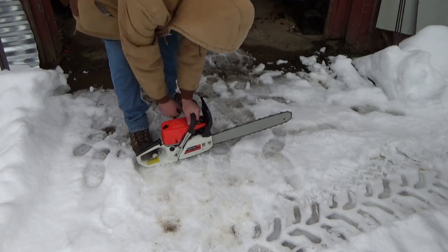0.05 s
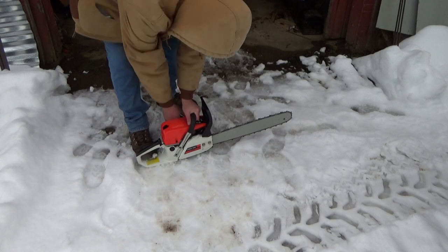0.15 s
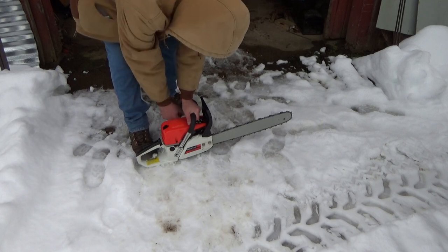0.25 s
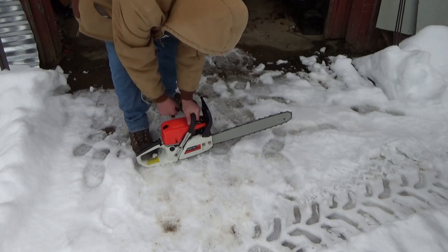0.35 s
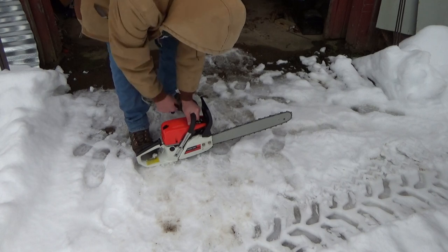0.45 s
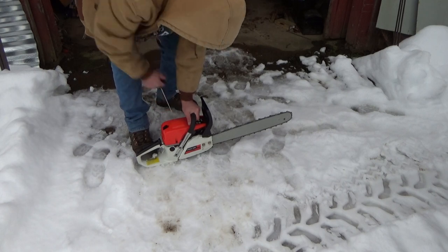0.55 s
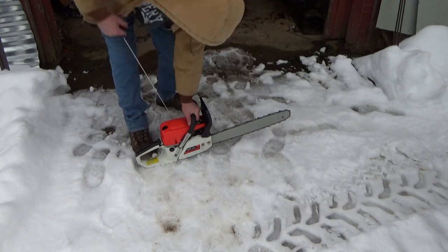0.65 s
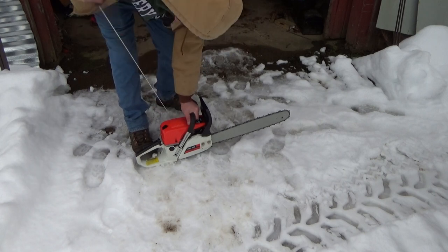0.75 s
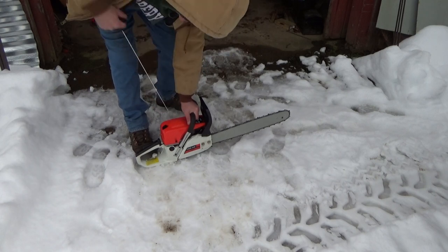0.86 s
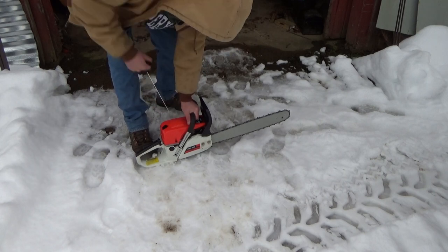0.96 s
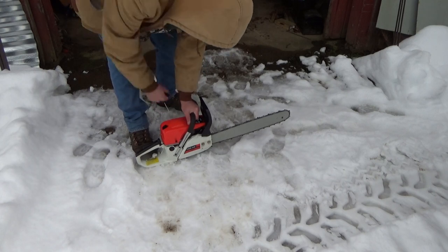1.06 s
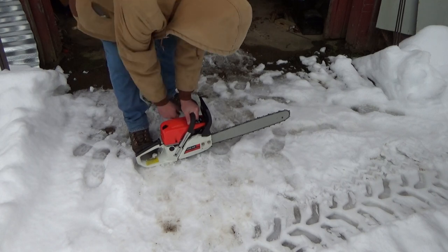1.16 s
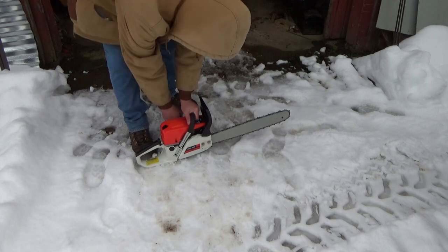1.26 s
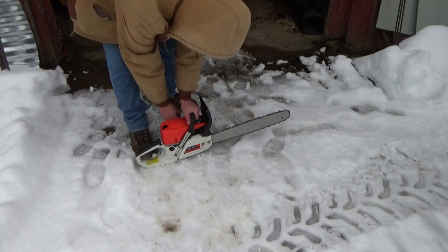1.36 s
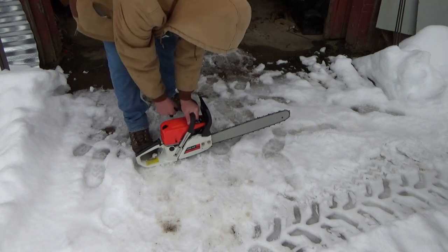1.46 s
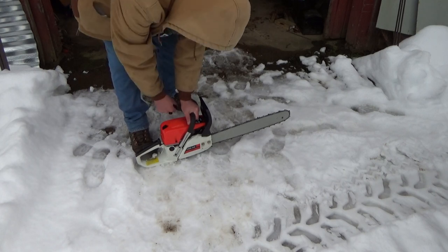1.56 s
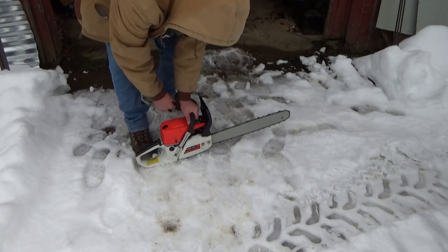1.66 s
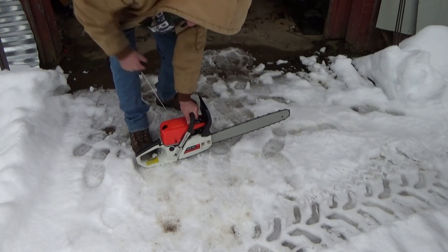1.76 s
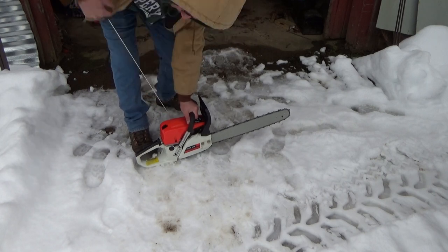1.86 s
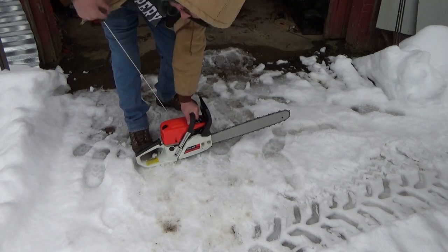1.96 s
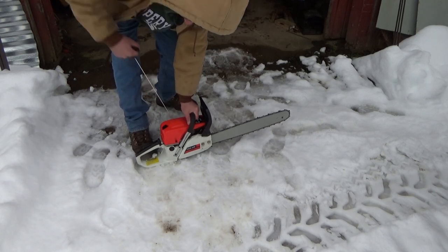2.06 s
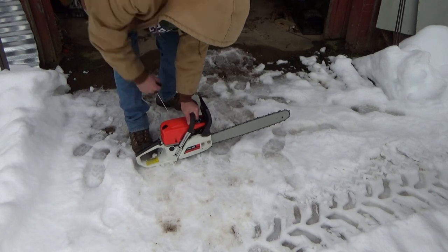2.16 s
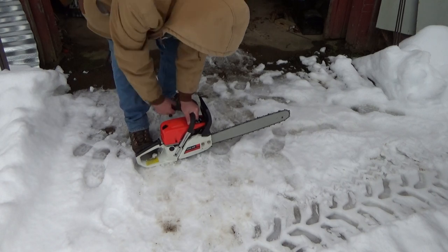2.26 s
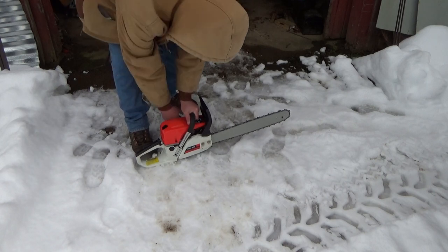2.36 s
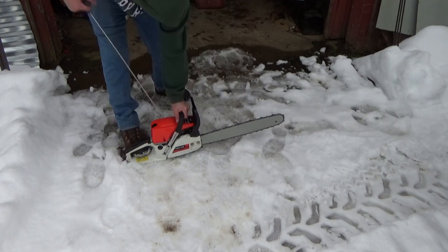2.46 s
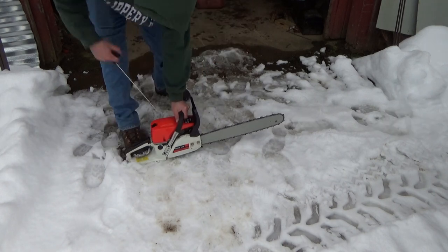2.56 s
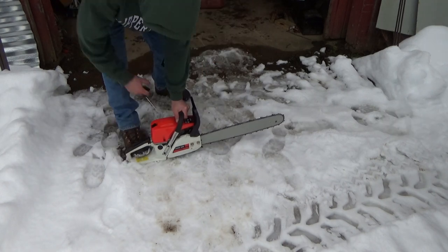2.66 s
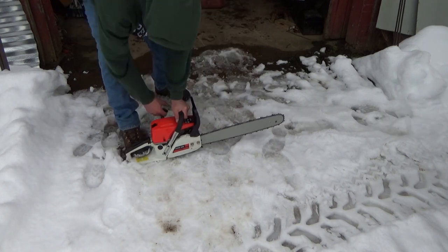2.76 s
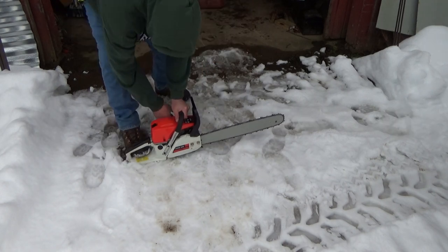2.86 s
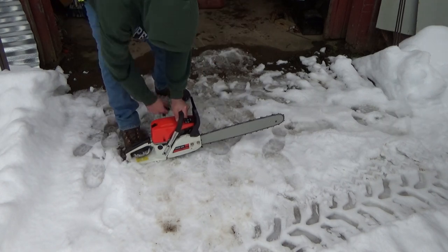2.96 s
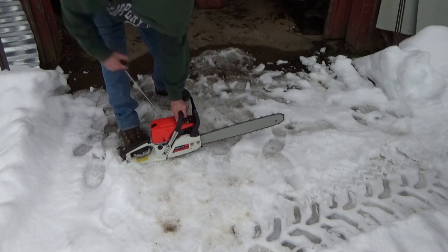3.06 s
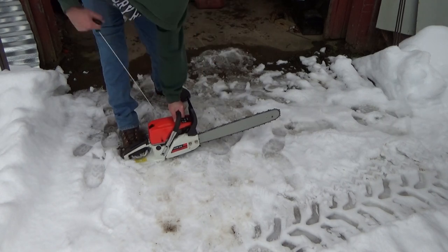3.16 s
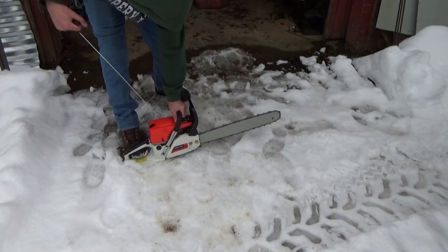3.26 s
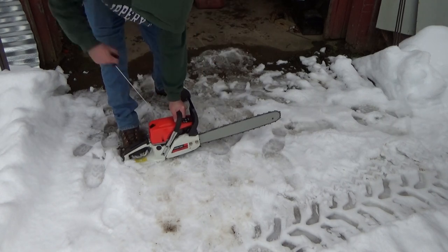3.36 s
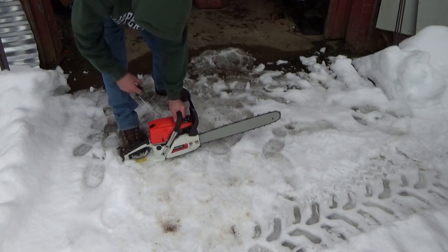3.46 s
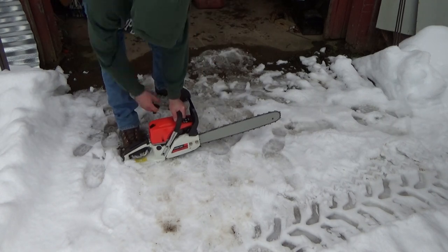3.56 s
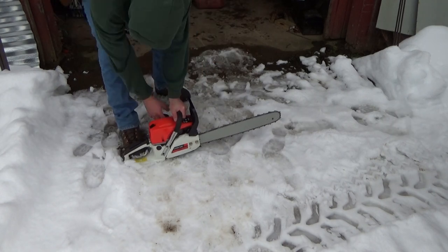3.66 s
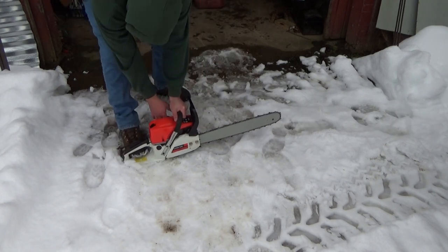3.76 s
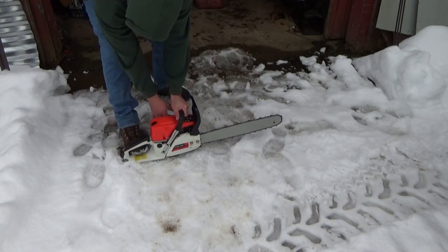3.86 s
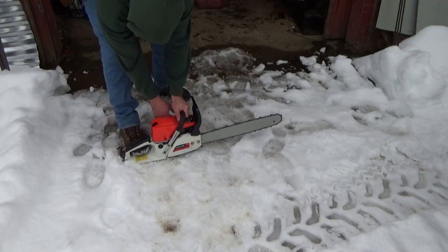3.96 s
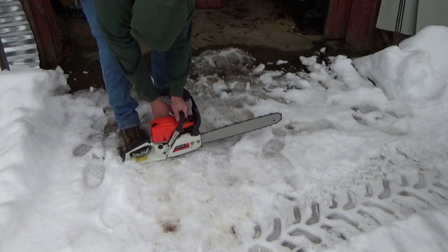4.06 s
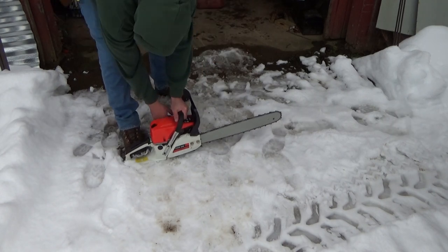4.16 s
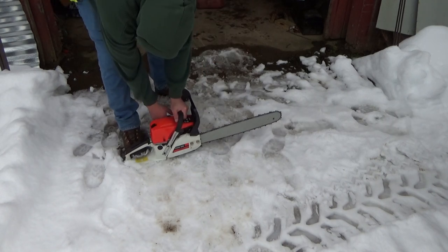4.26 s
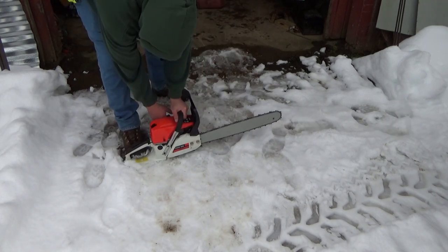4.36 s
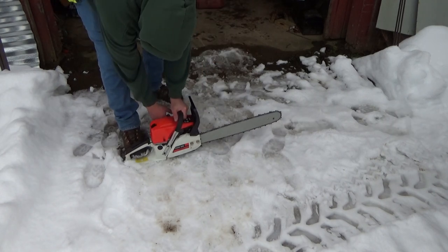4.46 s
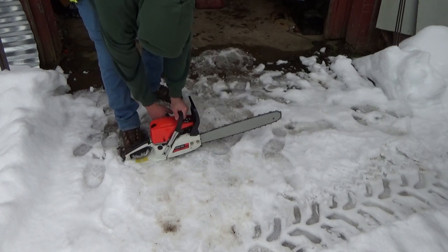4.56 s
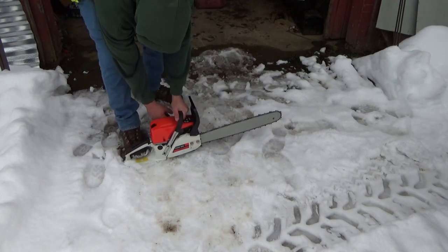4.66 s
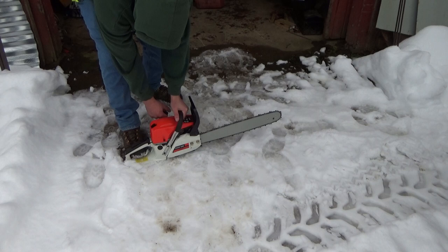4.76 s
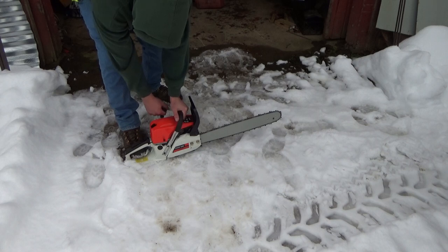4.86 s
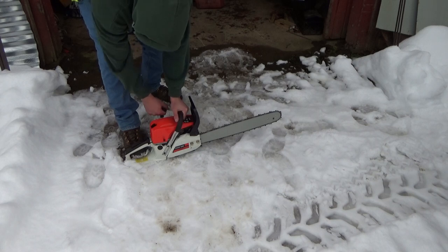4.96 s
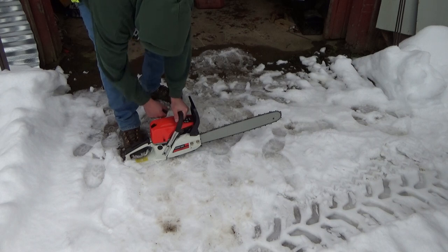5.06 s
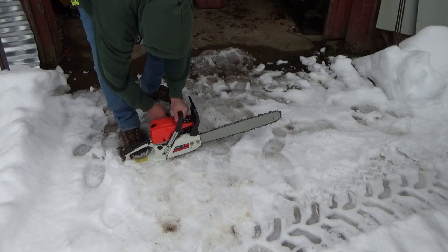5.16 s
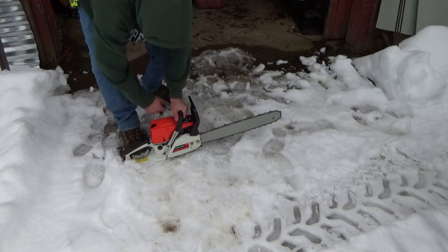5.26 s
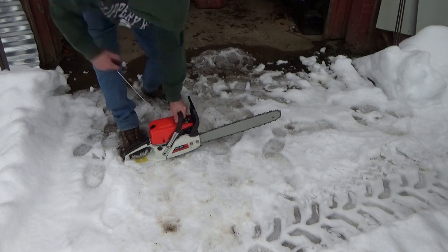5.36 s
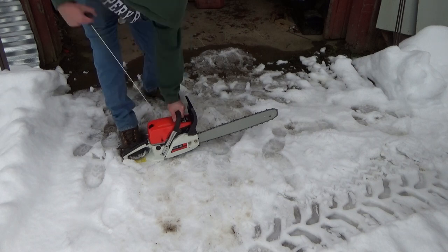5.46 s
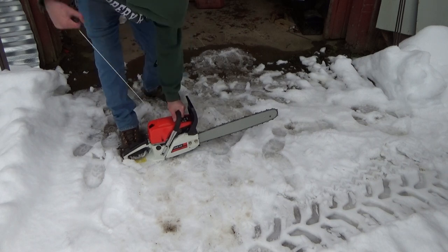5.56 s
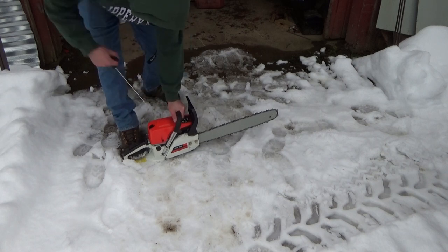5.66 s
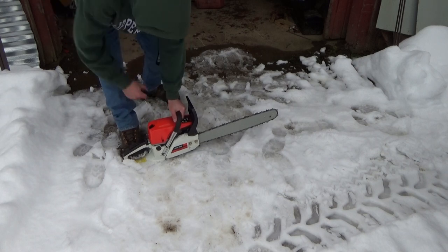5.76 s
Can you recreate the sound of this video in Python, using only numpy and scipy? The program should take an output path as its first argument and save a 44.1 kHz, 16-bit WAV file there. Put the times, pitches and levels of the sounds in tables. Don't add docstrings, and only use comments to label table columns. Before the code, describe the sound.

A cold chainsaw's starter cord is yanked five times, rasping and puffing, then ratcheting back slowly, with the engine never catching.

```python
import sys
import numpy as np
from scipy import signal
from scipy.fft import rfft, irfft, next_fast_len
from scipy.io import wavfile
from scipy.ndimage import uniform_filter1d

SR = 44100
rng = np.random.default_rng(int(sys.argv[2]) if len(sys.argv) > 2 else 0)


def wav_record(signal):
    frames = np.transpose(np.atleast_2d(signal))
    bounded = np.clip(frames, -1, 1)
    quanta = np.round(bounded * 32767).astype(np.int16)
    wavfile.write(sys.argv[1], SR, quanta)


def convert_level_to_amplitude(level_db):
    exponent = np.asarray(level_db, float) / 20
    return 10 ** exponent


N = 255559

# first stroke in seconds, spin-up gap in ms, fast gap in ms,
# number of fast strokes.
CRANK_SPINS = [
    (.772, 28.5, 21.7, 3),
    (1.91, 32, 21.4, 3),
    (3.2388, 28.2, 23.2, 2),
    (5.5175, 31.6, 25, 2),
]
COAST_GAPS_MS = [30, 45.5, 21, 49]
# pitch in Hz, width in Hz, level in dB.
PANELS = [(760, 26, -2), (1157, 1100, -40), (1292, 46, -2.5), (1572, 380, -4), (1830, 310, 7.5),
          (2144, 110, 6), (3030, 270, -8), (4860, 400, -68)]
# time in seconds, rms in dB,
# main pitch in Hz, tick relative to it in dB.
HANDLE_CLACKS = [(.6874, -14, 778, -8), (.7357, -19, 1220, -4), (.748, -17, 980, 2),
                 (.7881, -14.5, 754, -4), (1.1493, -29, 2100, 4), (2.214, -44, 2100, 0),
                 (3.4985, -40.5, 2100, 17.5), (1.3434, -21.5, 665, -3.5), (1.3563, -20, 685, -21),
                 (1.367, -36, 1120, 4.5), (1.8447, -18, 1155, -3.5), (1.8956, -13.5, 1193, -9),
                 (2.461, -26, 2720, 8), (2.4748, -23, 1344, -23), (2.9584, -25, 2172, 4.5),
                 (2.968, -20, 780, -10), (3.0747, -21.5, 633, -6.5), (3.131, -47, 903, 1),
                 (3.2144, -16, 760, 0.5), (3.823, -26.5, 2790, -2), (3.8308, -26.5, 730, -17),
                 (3.8527, -24, 580, -13), (5.2927, -28.5, 664, -16), (5.3167, -28, 735, -4.5),
                 (5.349, -22.5, 323, -7.5), (3.856, -26.5, 1277, -15), (5.3841, -22, 553, -13),
                 (5.431, -42, 710, 12), (5.4675, -22, 700, -9), (5.7306, -32, 606, 7)]
# time in seconds, rms in dB, main pitch in Hz, tick relative in dB.
GLOVE_TAPS = [(.397, -55, 900, 11.5), (.4576, -31.5, 572, -2), (.511, -42, 900, 4.5),
              (.548, -33.5, 710, -10), (1.5203, -32.5, 640, -10), (1.553, -32, 1680, -18),
              (1.5736, -46, 1600, 10.5), (1.617, -32.5, 416, -18), (1.641, -40, 784, -12),
              (2.51, -48, 900, 4), (4.51, -28, 150, -22), (4.525, -33, 200, -25), (4.6908, -49, 1500, 6),
              (4.957, -49, 2500, 1), (4.991, -63, 2500, 12), (5.022, -36, 1060, -20),
              (5.023, -45, 600, -22), (5.023, -24.5, 330, -16)]


def engine():
    # can resonance in Hz, level in dB, t60 in seconds.
    cans = [(230, 0, .06), (305, -5, .035), (378, -3, .05), (422, -2, .06), (480, -4.5, .04),
            (545, -7, .03), (620, -14, .035), (755, -15, .05), (910, -19, .04)]
    out = np.zeros(N)
    t = np.arange(-400, 6000) / SR
    puffs = crank()
    phases = rng.normal(0, .4, (len(puffs), len(cans)))
    late = np.maximum(t + 0.0007, 0) / 0.0011
    heave = late * (1 - late / 2) * np.exp(1 - late)
    for (s, db, hz, ring_db), row in zip(puffs, phases):
        width = np.where(t < 0, .4, .7) / hz
        swing = np.cos(2 * np.pi * hz * t * (1 - 0.24 * np.tanh(hz * t)))
        puff = swing * np.exp(-.5 * (t / width) ** 2)
        weakness_db = max(-20 - db, 0)
        ring = 0
        for (f, can_db, t60), phase in zip(cans, row):
            below_puff = 10.4 * np.maximum(np.log2(hz / f), 0)
            dulling = 4 * weakness_db * np.log2(f / 230)
            decay = 60 * abs(t) / t60
            ring = ring + convert_level_to_amplitude(can_db - below_puff - dulling - decay) * np.cos(2 * np.pi * f * t + phase)
        ringing = convert_level_to_amplitude(ring_db - 6.0) * np.clip(t / 0.0043, 0, 1) * ring
        add(out, s + t[0], convert_level_to_amplitude(db) * (puff + convert_level_to_amplitude(-8.0) * heave + ringing))
    return out


def crank():
    # time in seconds, peak in dB, pitch in Hz, muffler ring in dB.
    nudges = [
        (2.5497, -10, 324, 15),
        (2.566, -1, 233, 4),
        (2.603, -6, 180, 4.3),
        (2.635, -12, 195, 5),
        (2.6855, -23.5, 205, 9),
        (3.1235, -20, 174, 6.5),
        (3.1521, -20.5, 420, 21),
        (5.431, -19.5, 350, -0.5),
    ]
    # strength of the spin in dB, loss while coasting in dB per stroke.
    spin_levels = [(.1, 0.5), (.1, -0.65), (.1, -0.9), (.1, -0.8)]
    # peak in dB, pitch in Hz, muffler ring in dB.
    coasting = [(-6, 243, 4), (-11, 164, 5), (-20.5, 260, 6.5)]
    first, second, fast = (-3.5, 160, 2.6), (-2.5, 283, 4.4), (-6, 265, 4)
    last = (-24, 200, 12)
    rows = list(nudges)
    for (s, first_ms, fast_ms, count), (db, loss_db) in zip(CRANK_SPINS, spin_levels):
        times = s + np.cumsum([0, first_ms] + [fast_ms] * count + COAST_GAPS_MS) / 1000
        coast = [(d - k * loss_db, hz, ring) for k, (d, hz, ring) in enumerate(coasting + [last])]
        kinds = [first, second] + [fast] * count + coast
        rows += [(at, db + d, hz, ring) for at, (d, hz, ring) in zip(times, kinds)]
    return rows


def casing():
    # frequency in Hz, spectrum level in dB per Hz.
    bright_colour = [(1470, -11), (2500, -10.5), (3450, -6.5), (4070, -2.5), (4400, -1.5), (6070, -3.5),
                     (7740, -12), (9490, 1), (13400, -8.5), (15400, -23), (16300, -43)]
    # frequency in Hz, spectrum level in dB per Hz.
    body_colour = [(200, -7.5), (420, 1.5), (800, 0), (1300, -1), (2200, -2), (3200, 0), (5000, -18),
                   (8000, -30)]
    bright, body = rng.standard_normal((2, N))
    rings = 0
    for hz, width, db in PANELS:
        rings = rings + convert_level_to_amplitude(db) * evened(signal.lfilter(*signal.iirpeak(hz, hz / width, SR), body))
    bright = evened(coloured(bright, bright_colour))
    fizz = coloured(bright, [(7200, 0), (7800, -60)])
    sizzle = bright - fizz
    return fizz, sizzle, evened(coloured(body + convert_level_to_amplitude(-27.0) * rings, body_colour))


def strokes():
    # peak in seconds, rms in dB, rise in seconds, fall in seconds.
    swishes = [
        (3.91, -44.5, .02, 0.017),
        (4.08, -36, 0.013, 0.0085),
        (4.279, -37.5, 0.032, 0.0095),
        (4.57, -33, 0.036, 0.032),
        (4.28, -55.5, .2, 0.034),
        (4.575, -50, 0.084, 0.06),
    ]
    # start in seconds, level in dB.
    settles = [
        (0.224, -42),
        (1.36, -35),
        (2.471, -39.5),
        (2.955, -23),
        (3.849, -32),
    ]
    t = np.arange(N) / SR
    grip, scrape = (evened(uniform_filter1d(rng.standard_normal(N), size=n)) for n in (260, 110))
    drawn, winding = rubbing(t)
    parts = [drawn, winding, convert_level_to_amplitude(-69) ** 2]
    total = sum(parts)
    # casing body relative in dB, sizzle tilt in dB
    colours = [(-0.75, -0.62), (-2, 2.7), (1.3, -8)]
    tilt_db = sum(p * tilt for p, (_, tilt) in zip(parts, colours)) / total
    slack = (winding + 1e-9) / (total + 1e-9)
    settle = sum(convert_level_to_amplitude(db - 298 * abs(t - s)) ** 2 * (t > s) for s, db in settles)
    bright = total * convert_level_to_amplitude(1.3 * grip) ** 2
    body = sum(p * convert_level_to_amplitude(db) ** 2 for p, (db, _) in zip(parts, colours))
    body = (body + settle) * convert_level_to_amplitude(2.8 * grip) ** 2
    bursts = np.zeros(N)
    for at, db, ms in ticks():
        rise = np.clip(ms, 1, 20) * .00024
        u = t[:SR // 10] / rise
        add(bursts, at - rise, convert_level_to_amplitude(db - 1.78) ** 2 * (u * np.exp(1 - u)) ** 0.6)
    glove = 0
    for at, db, rise, fall in swishes:
        glove = glove + convert_level_to_amplitude(db) ** 2 * np.exp(-((t - at) / np.where(t < at, rise, fall)) ** 2)
    fizz = np.sqrt(bright + bursts + glove)
    sizzle = fizz * convert_level_to_amplitude(tilt_db + 2.0 * scrape * np.sqrt(1 - glove / fizz ** 2))
    body = np.sqrt(body + convert_level_to_amplitude(-8.0 - 1.3 * slack) ** 2 * bursts + convert_level_to_amplitude(-4.5) ** 2 * glove)
    return fizz, sizzle, body


def rubbing(t):
    # cord starts in seconds, cord at full speed in seconds, cord let go in seconds, rubbing in dB.
    pulls = [
        (0.632, 0.704, 0.87, -28),
        (1.784, 1.868, 1.994, -26),
        (2.527, 2.531, 2.55, -25.5),
        (3.053, 3.17, 3.3, -25.5),
        (5.323, 5.478, 5.63, -29),
    ]
    rest_db, let_go_db_per_s, winding_db_per_oct = -48.5, 74, 11.5
    drawn = 0
    for start, full, let_go, db in pulls:
        times = [start - .02, start, full, let_go, let_go + 1]
        level = np.interp(t, times, [-99, rest_db, db, db, db - let_go_db_per_s])
        drawn = drawn + convert_level_to_amplitude(level) ** 2 * (t < let_go + .4)
    winding = 0
    for s, lost, _, db in ratchet():
        times = [s[0] - .2, *s, s[-1] + 0.02]
        level = np.interp(t, times, [-75, *(db - winding_db_per_oct * lost), -75])
        winding = winding + convert_level_to_amplitude(level) ** 2
    return drawn, winding


def ratchet():
    # last tooth in seconds, last gap in ms, fast gap in ms, number of teeth.
    rewinds = [
        (.2145, 51, 17, 8),
        (1.3067, 47, 22, 9),
        (2.4273, 40, 21, 11),
        (2.9516, 54.6, 16, 11),
        (3.7626, 53.6, 21.5, 8),
    ]
    # tooth level in dB, rubbing level in dB.
    rewind_levels = [(-23, -31.5), (-22, -30.5), (-23.5, -35), (-24, -34), (-25.5, -38)]
    for (last, last_ms, fast_ms, count), (tooth_db, rub_db) in zip(rewinds, rewind_levels):
        gap = fast_ms + (last_ms - fast_ms) * .56 ** np.arange(count)
        s = last - (np.cumsum(gap) - gap) / 1000
        yield s[::-1], np.log2(gap / fast_ms)[::-1], tooth_db, rub_db


def ticks():
    # peak in seconds, rms in dB, length in ms.
    snaps = [(.0073, -16, 7.4), (.652, -29, 5.4), (.7646, -25, 19), (.9105, -27, 6), (.9204, -20, 6.6),
             (1.0183, -24, 9.9), (1.0418, -17.5, 8.6), (1.8138, -31, 8.5), (1.9518, -17.5, 7.1),
             (2.0261, -23.5, 5), (2.137, -23, 2.8), (2.232, -21.5, 20), (2.262, -18.5, 18),
             (2.3466, -16, 3.2), (2.356, -19.5, 10), (2.5513, -19.5, 16), (2.5726, -25, 13),
             (2.593, -22.5, 6.7), (2.607, -16.5, 3.9), (2.6576, -26, 9.9), (3.1546, -21, 7.2),
             (3.239, -27, 6), (3.2933, -18, 4.5), (3.3367, -35, 2), (3.3555, -17, 3.5), (3.5244, -20.5, 24),
             (5.4966, -20, 5.4), (5.5115, -19.5, 11), (5.5574, -19.5, 23), (5.7549, -26.5, 20)]
    rows = list(snaps)
    for s, lost, db, _ in ratchet():
        for at, octaves in zip(s, lost):
            a, b = rng.standard_normal(2)
            rows += [(at, db - 2 * octaves + .9 * a, 6.5 * convert_level_to_amplitude(1.5 * b))]
    for s, first_ms, fast_ms, count in CRANK_SPINS:
        rows += [(s + 0.0075, -28, 8)]
        overrun = s + (first_ms + count * fast_ms + sum(COAST_GAPS_MS[:2])) / 1000 - 0.0114
        rows += [(overrun + 0.007 * k, -21.5 + rng.standard_normal(), 3.75) for k in range(6)]
    for knock_rows, ms in ((HANDLE_CLACKS, 6), (GLOVE_TAPS, 5.3)):
        rows += [(s - .002, db + tick_db, ms) for s, db, _, tick_db in knock_rows]
    return rows


def mottled(x, depth_db):
    z = signal.stft(x, nperseg=256, noverlap=192)[2]
    patches = uniform_filter1d(rng.standard_normal(z.shape), size=6, axis=0)
    patches = evened(uniform_filter1d(patches, size=7, axis=1))
    return signal.istft(z * convert_level_to_amplitude(depth_db * patches), nperseg=256, noverlap=192)[1][:N]


def knocks():
    # frequency in Hz, spectrum level in dB per Hz.
    crack_colour = [(200, -14), (500, 3.5), (1200, 1), (3000, -1.5), (6000, -15), (8000, -15), (16000, -39)]
    out = np.zeros(N)
    t = np.arange(5000) / SR
    hits = blows()
    phases = rng.uniform(0, 2 * np.pi, (len(hits), len(PANELS)))
    cracks = evened(coloured(rng.standard_normal((len(hits), len(t))), crack_colour))
    for (s, db, hz, t60), row, crack in zip(hits, phases, cracks):
        others = 0
        for (f, *_), phase in zip(PANELS, row):
            others = others + convert_level_to_amplitude(-7 - 4 * abs(np.log2(f / hz))) * np.sin(2 * np.pi * f * t + phase)
        shape = convert_level_to_amplitude(db + 3.0 - 60 * t / np.clip(t60, .01, .2)) * np.clip(t / 0.0017, 0, 1)
        hard = convert_level_to_amplitude(-1.0) * np.clip(hz / 1100, 0, 1)
        add(out, s - .0025, shape * (np.sin(2 * np.pi * hz * t) + others + hard * crack))
    return out


def blows():
    clack_t60_s, tap_t60_s, panel_t60_s = 0.039, 0.023, 0.09
    rows = [(*row[:3], clack_t60_s) for row in HANDLE_CLACKS]
    rows += [(*row[:3], tap_t60_s) for row in GLOVE_TAPS]
    for s, _, db, _ in ratchet():
        rows += [(at + .004, db - 14, 2100, panel_t60_s) for at in s[-2::-2]]
    return rows


def yard():
    # frequency in Hz, spectrum level in dB per Hz.
    yard_colour = [(12, -40), (20, -6), (71, 0), (147, -3.5), (194, -13.5), (350, -7.5), (745, -12.5),
                   (1310, -17), (3490, -23.5), (6830, -31.5), (9840, -29.5), (15000, -38), (16300, -42)]
    t = np.arange(N) / SR
    air = rng.standard_normal((2, N))
    hum_swell = convert_level_to_amplitude(10 * np.exp(-((t - 4.2) / 0.2) ** 4))
    hum = signal.lfilter(*signal.iirpeak(425, 6, SR), air) * hum_swell
    mid, side = coloured(air + convert_level_to_amplitude(-4.0) * hum, yard_colour[:-1])
    swell = evened(uniform_filter1d(rng.standard_normal(N), size=5000))
    return convert_level_to_amplitude(-50 + 1.3 * swell) * np.array([mid, convert_level_to_amplitude(-3.1) * side]) / np.std(mid)


def echoes(x, taps, tail_db, t60):
    t = np.arange(SR // 4) / SR
    tail = rng.standard_normal(len(t)) * convert_level_to_amplitude(-60 * t / t60) * (t > .012)
    path = convert_level_to_amplitude(tail_db) * tail / np.linalg.norm(tail)
    for delay, db in taps:
        path[round(delay * SR)] += convert_level_to_amplitude(db)
    return signal.oaconvolve(x, path)[:N]


def evened(x):
    return x / np.sqrt(np.mean(x ** 2) + 1e-20)


def coloured(x, points):
    f, level = np.transpose(points)
    size = next_fast_len(x.shape[-1])
    hz = np.fft.rfftfreq(size, 1 / SR)
    gain = convert_level_to_amplitude(np.interp(np.log(hz + 1), np.log(f + 1), level))
    return irfft(rfft(x, size) * gain, size)[..., :x.shape[-1]]


def add(mix, s, sound):
    part = mix[max(round(s * SR), 0):][:len(sound)]
    part += sound[:len(part)]


def scene():
    # frequency in Hz, level in dB.
    wall_colour = [(90, -0.5), (170, -12.5), (260, 0), (450, 0)]
    # delay in seconds, level in dB.
    front_taps = [(.0062, -9), (.0095, -7.5), (.0144, -12)]
    # delay in seconds, level in dB.
    side_taps = [(.0047, -8.5), (.0101, -11), (.016, -19)]
    # frequency in Hz, gain of the side signal in dB.
    side_colour = [(60, -32), (130, -1.5), (290, 1.5), (640, 0.5), (1410, 2), (3100, -1.5), (6820, -0.5),
                   (15000, -15.5)]
    rasp = sum(noise * envelope for noise, envelope in zip(casing(), strokes()))
    rasp = mottled(rasp, 2.2) + knocks()
    puffs = engine()
    mid, side = yard()
    mid = mid + convert_level_to_amplitude(-2.0) * rasp + convert_level_to_amplitude(-13) * echoes(rasp, [(.0098, -7)], -1.8, 0.18)
    mid = mid + puffs + echoes(coloured(puffs, wall_colour), front_taps, -11, .17)
    lead = np.gradient(puffs) * SR / (2 * np.pi * 200)
    side = side + convert_level_to_amplitude(-12) * echoes(rasp, [(.0058, 1), (.0101, -15)], .1, 0.34) + convert_level_to_amplitude(-18.0) * lead
    side = side + echoes(puffs, side_taps, -14, .2)
    side = coloured(side, side_colour)
    return np.array([mid + side, mid - side])


def low_pass(x):
    return signal.sosfilt(signal.butter(12, 16450, fs=SR, output="sos"), x)


def record(dry):
    # fade out start and end, fade in start and end, all in seconds.
    change = (2.524, 2.534, 2.5465, 2.5485)
    fade = np.interp(np.arange(N) / SR, change, [1, convert_level_to_amplitude(-38), convert_level_to_amplitude(-38), 1])
    hiss = convert_level_to_amplitude(-78) * coloured(rng.standard_normal(N), [(15900, -4), (16200, -60)]) * fade
    faded = dry * fade
    limited = faded / (1 + abs(faded) ** 8) ** (1 / 8)
    edged = signal.oaconvolve(limited, signal.firwin(255, 16150, fs=SR)[None], "same")
    return low_pass(edged + hiss)


dry = scene()
out = record(dry)
wav_record(out)
```